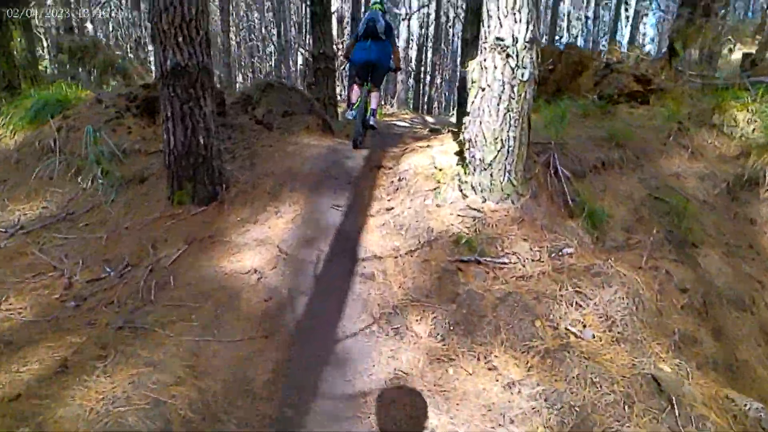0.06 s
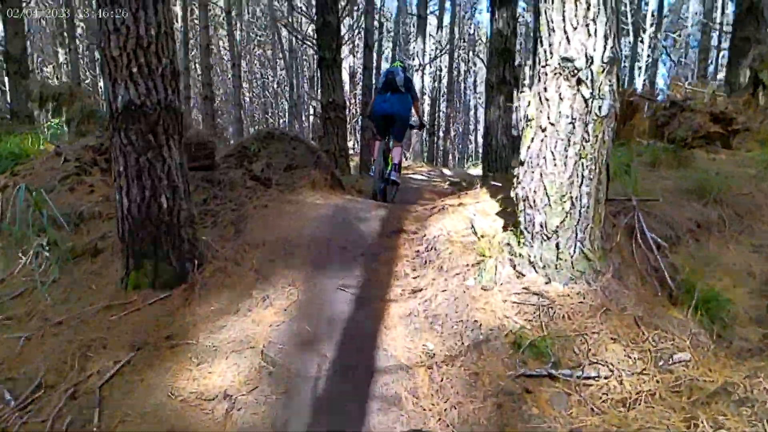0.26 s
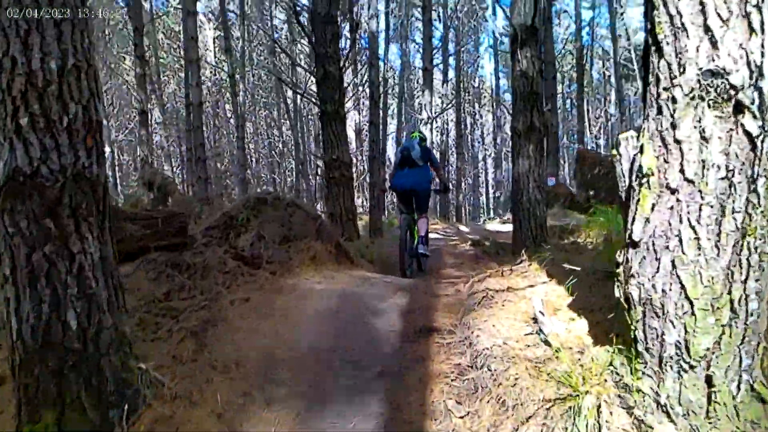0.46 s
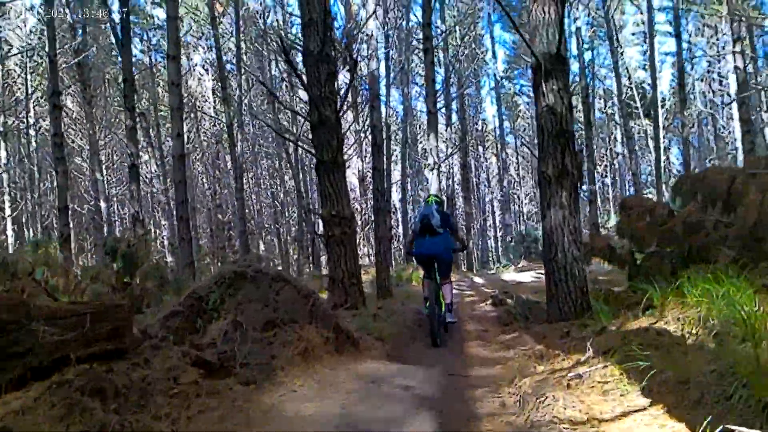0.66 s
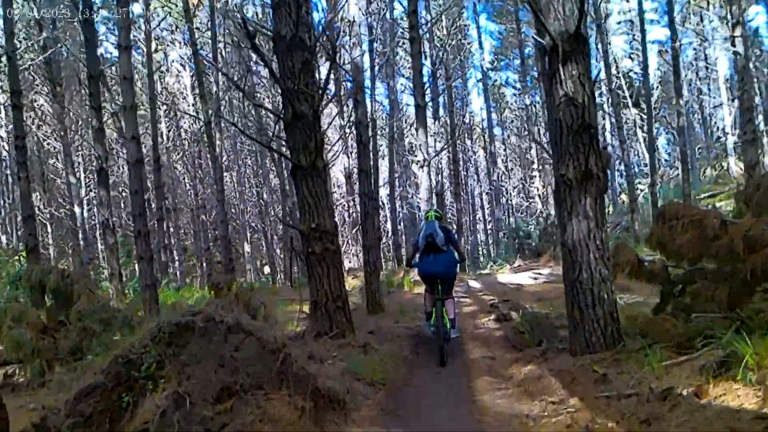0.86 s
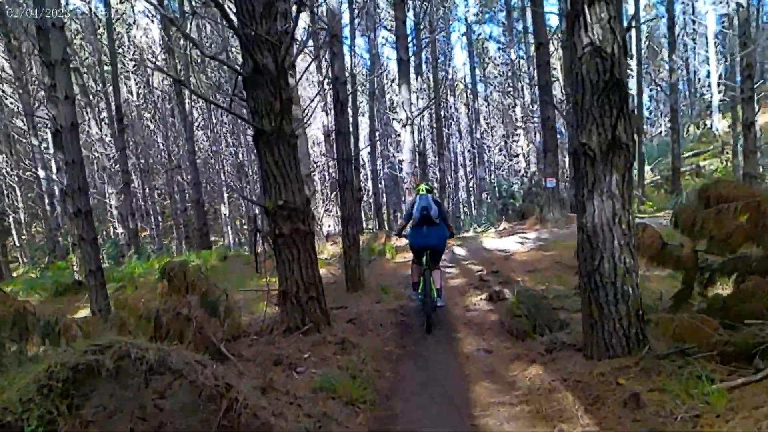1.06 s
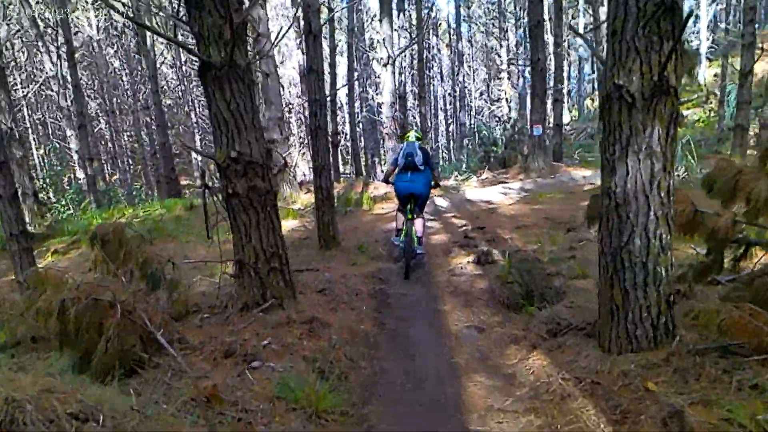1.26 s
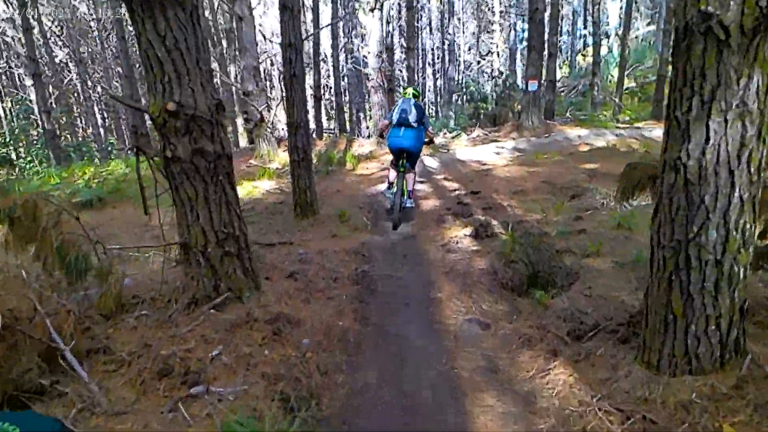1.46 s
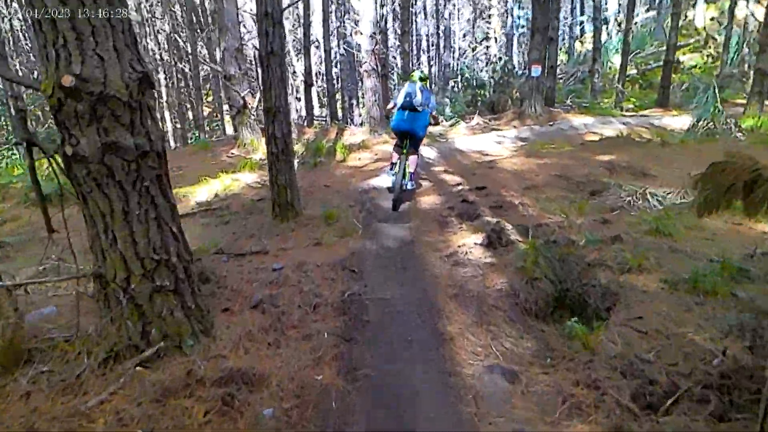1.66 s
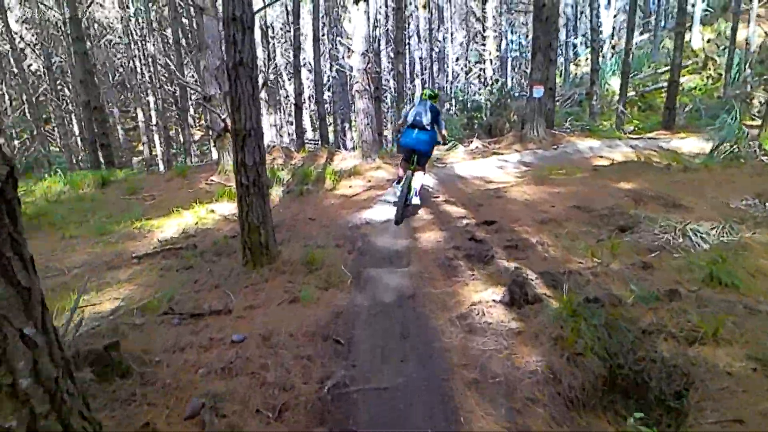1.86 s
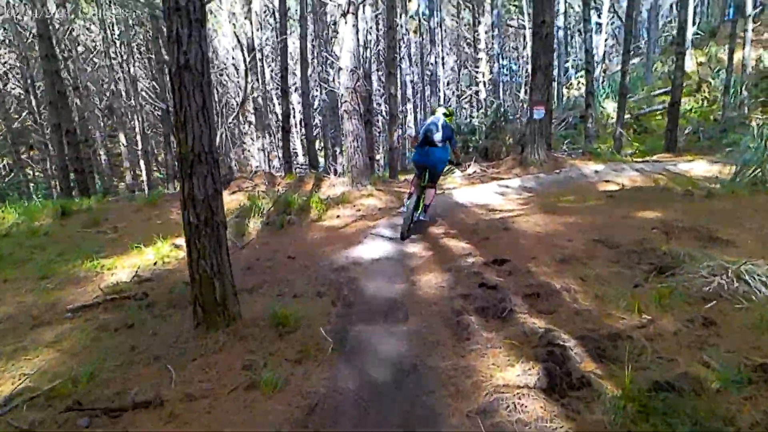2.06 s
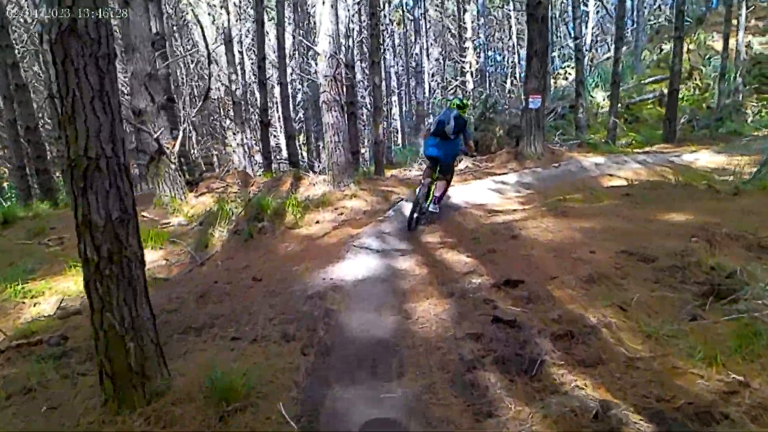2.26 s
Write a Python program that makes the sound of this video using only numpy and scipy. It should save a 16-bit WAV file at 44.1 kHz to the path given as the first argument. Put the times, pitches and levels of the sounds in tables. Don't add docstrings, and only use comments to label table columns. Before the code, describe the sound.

Mountain bike on a forest dirt trail, heard from a mic in a closed case on the rider: three hard clipped knocks early, then softer bumps, light ticks, low rumble and steady hiss.

```python
import sys
import numpy as np
from scipy import signal
from scipy.fft import rfft, irfft
from scipy.io import wavfile

SR = 44100
rng = np.random.default_rng(int(sys.argv[2]) if len(sys.argv) > 2 else 0)


def level_to_linear(level):
    exponent = np.asarray(level, float) / 20
    return 10 ** exponent


def output_pcm(signal):
    pcm = np.clip(np.atleast_2d(signal).T, -1, 1) * 32767
    wavfile.write(sys.argv[1], SR, np.round(pcm).astype(np.int16))


N = 103635


def rms_one(x):
    return x / np.sqrt(np.mean(x ** 2) + 1e-20)


def low(x, hz, order=2):
    return signal.sosfilt(signal.butter(order, min(hz, 0.4 * SR), fs=SR, output="sos"), x)


def drift(rate_hz):
    r = np.exp(-2 * np.pi * rate_hz / SR)
    settled = signal.lfilter([1], [1, -2 * r, r * r], rng.standard_normal(N + SR))[SR:]
    return rms_one(settled)


def ring(drive, hz, t60):
    r = level_to_linear(-60 / (t60 * SR))
    w = 2 * np.pi * hz / SR
    return signal.lfilter([0, np.sin(w)], [1, -2 * r * np.cos(w), r * r], drive + 1e-18)


def burst(start, rise_ms, fall_ms):
    ms = (np.arange(N) / SR - start) * 1000
    return np.exp(-np.where(ms < 0, -ms / rise_ms, ms / fall_ms))


def swings(start, lengths_ms, heights):
    t = np.arange(N) / SR - start
    edges = np.cumsum([0, *lengths_ms]) / 1000
    turns = np.interp(t, edges, np.arange(len(edges)))
    height = np.interp(turns, np.arange(len(heights)) + 0.5, heights)
    return height * np.sin(np.pi * turns)


def banded_noise(spectrum, patchy_db, patch_hz):
    hz, db = np.transpose(spectrum)
    settle = 4410
    together = drift(patch_hz)
    white = rng.standard_normal((2, N + settle))
    edges = hz[0] * 2 ** np.arange(0, np.log2(hz[-1] / hz[0]), 1 / 3)
    out = 0
    for k, (bottom, top) in enumerate(zip(edges, edges[1:])):
        sos = signal.butter(2, [bottom, top], "band", fs=SR, output="sos")
        band = signal.sosfilt(sos, white[k % 2])[settle:]
        band_db = np.interp(np.log(bottom * top) / 2, np.log(hz), db)
        flicker_db = patchy_db * (together + 1.07 * drift(patch_hz))
        out = out + band * level_to_linear(band_db + flicker_db)
    return rms_one(out)


def tyres():
    # time in seconds, level in dB.
    roughness = [(0.0, -33), (0.11, -50), (0.31, -40.5), (0.46, -46.5), (0.79, -48.5), (0.87, -47),
                 (1.01, -47.5), (1.28, -55.5), (1.46, -54), (1.79, -52), (1.99, -46), (2.15, -46.5),
                 (2.35, -49)]
    # frequency in Hz, density in dB per Hz.
    rumble_spectrum = [(8.8, -39), (15, 4.5), (37, -8), (177, -14), (241, -22.5), (296, -20), (369, -30.5),
                       (900, -45), (1170, -62), (1980, -120)]
    # frequency in Hz, density in dB per Hz.
    roll_spectrum = [(180, -26), (300, -8.5), (371, 6.5), (421, -8), (605, -5), (1570, -9.5), (2430, -14.5),
                     (4220, -19), (6000, -22), (7800, -22), (13200, -120)]
    s, db = np.transpose(roughness)
    rough_db = np.interp(np.arange(N) / SR, s, db)
    rumble = level_to_linear(rough_db + 7.5) * banded_noise(rumble_spectrum, patchy_db=3.54, patch_hz=7.6)
    roll_db = -57.5 + 0.16 * (rough_db - rough_db.mean())
    roll = level_to_linear(roll_db) * banded_noise(roll_spectrum, patchy_db=0.8, patch_hz=20)
    return rumble + roll


def heaves():
    # start in seconds, peak in dB, rise and fall in ms, dip before and sag after as shares of the peak.
    bumps = [(-.035, -16.5, 8.5, .2, 0.7), (.118, -19.5, 21.7, .1, 0.45), (0.3375, -13.5, 24, 0.33, 0.67),
             (0.544, -12, 25, 0.5, 0.36), (0.731, -29.5, 59, 0.18, .7), (.944, -23, 27.3, 0.38, 0.43),
             (1.119, -41.5, 40, .3, 1.4), (1.245, -31.5, 25, 0.53, 0.23), (1.4601, -8.5, 18.5, 0.56, 0.24),
             (1.6, -32.5, 24, 0.13, .9), (2.068, -15.5, 23.7, 0.34, 0.33), (2.143, -31.5, 47, 0.13, 0.77),
             (2.209, -41.5, 31, 0.75, 2.8), (2.269, -24.5, 33, 0.18, 0.79)]
    dip_ms, sag_peak_ms, sag_ms, rise_share = 12, 5, 22, 0.27
    t = np.arange(N) / SR
    out = 0
    for s, db, ms, dip, sag in bumps:
        since = (t - s) * 1000
        after = np.maximum(since - ms, 0)
        tail = (1 - np.exp(-after / sag_peak_ms)) * np.exp(-after / sag_ms) * 2
        turns = np.interp(since, [-dip_ms, 0, rise_share * ms, ms], [-1, 0, 0.5, 1])
        swell = np.sin(np.pi * turns) * np.where(turns < 0, dip, 1)
        swell = np.where(turns > 0.5, np.abs(swell) ** 0.66, swell)
        out = out + level_to_linear(db) * (swell - sag * tail)
    return low(out, 450)


def grinds():
    # peak time in seconds, level in dB, rise in ms, fall in ms, brightness in Hz.
    loads = [(.001, -36, 0.41, 4.4, 1500), (0.117, -40, 6.1, 5.6, 490), (0.198, -30.5, 2.3, 11, 890),
             (0.329, -40, 9, 30, 560), (0.389, -11, 1, 3, 1490), (.405, -37.5, 3, 14, 830),
             (0.537, -39, 5.7, 20, 544), (0.594, -44.5, 9, 21, 856), (.775, -41, 4.6, 17, 377),
             (1.229, -43, 5.2, 21, 473), (1.368, -45.5, 24, 75, 430), (1.453, -33.5, 8.8, 12, 1090),
             (.97, -51.5, 20, 64, 487), (0.6, -27.5, 2.5, 8.6, 436), (1.923, -39, 6.5, 7.2, 650),
             (1.53, -48, 38, 79, 272), (2.06, -43, 4.4, 21, 580), (2.125, -56, 5, 17, 500)]
    grit = rng.standard_normal(N)
    out = 0
    for s, db, rise_ms, fall_ms, hz in loads:
        out = out + level_to_linear(db) * burst(s, rise_ms, fall_ms) * rms_one(low(grit, hz, order=3))
    return signal.sosfilt(signal.butter(2, 204, "high", fs=SR, output="sos"), out)


def ticks():
    # time in seconds, peak in dB.
    taps = [(0.0463, -33), (0.0897, -42), (0.8719, -33.5), (0.8824, -32), (0.9467, -44), (0.9757, -38),
            (1.0705, -40), (1.2236, -37.5), (1.2444, -42), (1.2715, -31.5), (1.2844, -40), (1.3254, -34.5),
            (1.3894, -37), (1.4496, -45), (1.4969, -38), (1.5439, -36), (1.5883, -41.5), (2.2413, -32.5),
            (2.2802, -42.5), (2.3261, -34), (2.3361, -38)]
    # frequency in Hz, level in dB, t60 in seconds.
    modes = [(1012, -6.5, 0.025), (1266, -7.5, 0.047), (1568, -6.5, 0.024), (1828, -2.5, 0.011),
             (2052, -8.5, 0.019), (2610, -16, 0.017), (3430, -18, 0.011), (4300, -16.5, 0.018)]
    luck = rng.standard_normal((len(taps), len(modes)))
    shapes = np.array([level_to_linear(db - 9) * burst(s, rise_ms=0.5, fall_ms=5) for s, db in taps])
    chatter = level_to_linear(-61 + 4 * drift(37))
    out = 0
    for k, (hz, level_db, t60) in enumerate(modes):
        tapping = level_to_linear(1.8 * luck[:, k]) @ shapes
        tilt_db = 5.5 * np.log2(hz / 1500)
        drive = tapping + chatter * level_to_linear(0.94 * drift(14) + tilt_db)
        scratch = level_to_linear(level_db) * drive * rng.standard_normal(N) / 10
        out = out + ring(scratch, hz, t60)
    return out


def shudders():
    # start in seconds, level in dB, frequency in Hz, t60 in seconds, first direction as a sign.
    blows = [(.118, -28, 166, 0.048, 1), (0.3297, -21, 177, 0.038, -1), (0.382, -17, 194, 0.02, -1),
             (0.534, -22, 161, 0.025, -1), (.5835, -22, 181, .03, -1), (0.7724, -22.5, 105.7, 0.12, 1),
             (.936, -33, 129, 0.055, 1), (0.982, -28, 83.6, 0.15, -1), (1.355, -35.5, 110, 0.14, 1),
             (1.377, -37.5, 97, 0.29, 1), (1.418, -32.5, 103, 0.082, -1), (1.4499, -9.5, 189.7, 0.066, -1),
             (1.752, -33.5, 89, 0.057, 1), (2.054, -25.5, 136, .08, -1), (2.125, -26, 95, 0.032, 1)]
    out = 0
    for s, db, hz, t60, way in blows:
        click = np.zeros(N)
        click[int(s * SR)] = np.sign(way) * level_to_linear(db)
        out = out + ring(click, hz, t60)
    return low(low(out, 270), 1050)


def knocks():
    # time in seconds, peak in dB, first swing in ms, first swing in dB, rebound in dB.
    jolts = [
        (.2060, 4, 2.8, 1, -2.8),
        (.3936, 9, 2.05, 9, 0),
        (.6014, 0, 3.0, -2.2, -6.2),
        (1.9258, -3.3, 5.4, -8, -8.7),
    ]
    push_ms, rebound_ms, wobble_ms = 5.3, 6.2, 4
    sharp_hz = 1800
    out = 0
    for s, db, first_ms, first_db, rebound_db in jolts:
        quick = (jolts[1][2] / first_ms) ** 2
        filter_delay = 0.22 / (sharp_hz * quick)
        start = s - (first_ms + push_ms / 2) / 1000 - filter_delay
        lengths = [first_ms, push_ms, rebound_ms]
        swing = swings(start, lengths, level_to_linear([first_db, db, rebound_db]))
        wobble = level_to_linear(min(rebound_db, -2.5)) * 0.2 * 0.62 ** np.arange(6)
        swing -= swings(start + sum(lengths) / 1000, [wobble_ms] * 6, wobble)
        wind_up = 0.22 * quick * np.array([0.5, 1.1])
        swing += swings(start - 0.0022, [1.2, 1.0], wind_up)
        out = out + low(swing, sharp_hz * quick)
    return out


def scene():
    return (tyres() + heaves() + grinds() + ticks() + shudders() + knocks())[None]


def band_limit(x):
    return signal.sosfilt(signal.butter(12, 16650, fs=SR, output="sos"), x)


def record(dry):
    hiss = level_to_linear(-59) * rms_one(signal.lfilter([1, -0.12], [1], rng.standard_normal(dry.shape)))
    passed = np.arange(N // 2 + 1) * SR / N < 15750
    limited = irfft(rfft(dry + hiss) * passed, N)
    ceiling = 0.707
    return band_limit(np.clip(limited, -ceiling, ceiling))


dry = scene()
out = record(dry)
output_pcm(out)
```